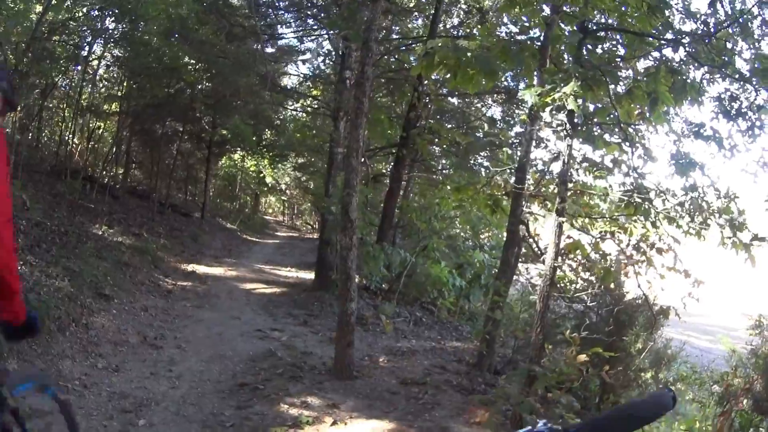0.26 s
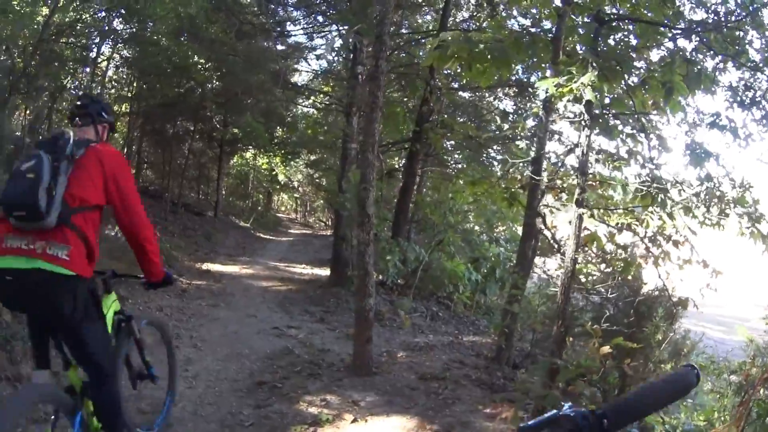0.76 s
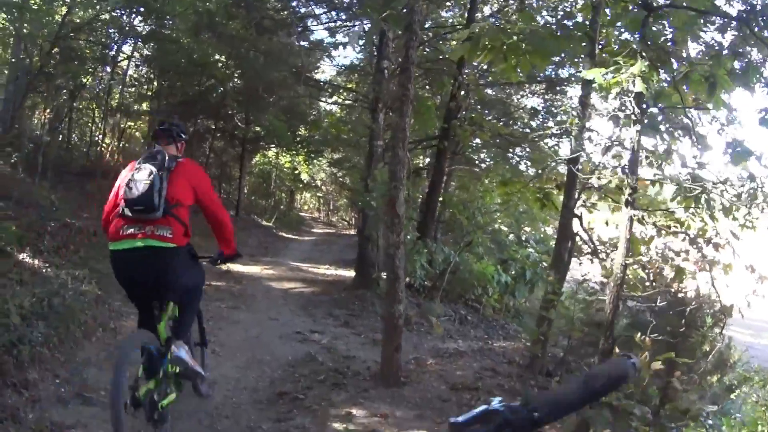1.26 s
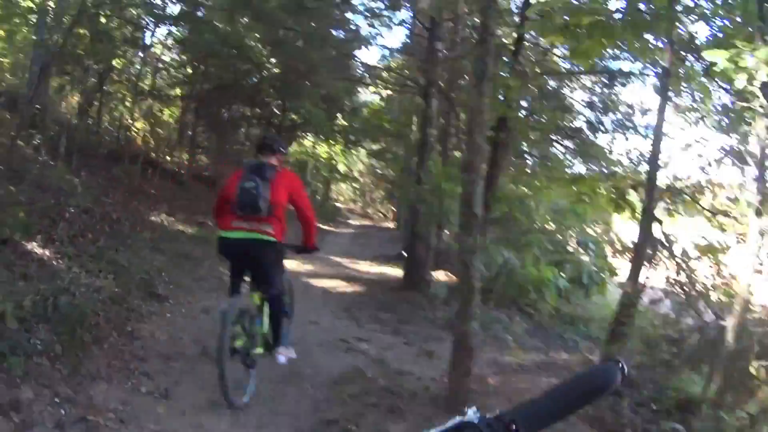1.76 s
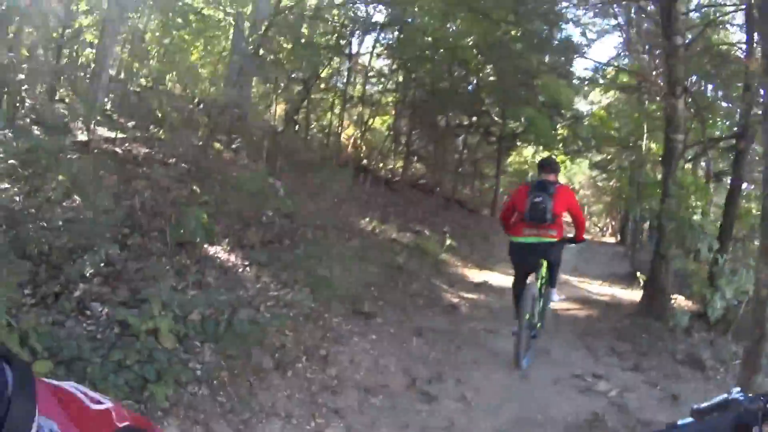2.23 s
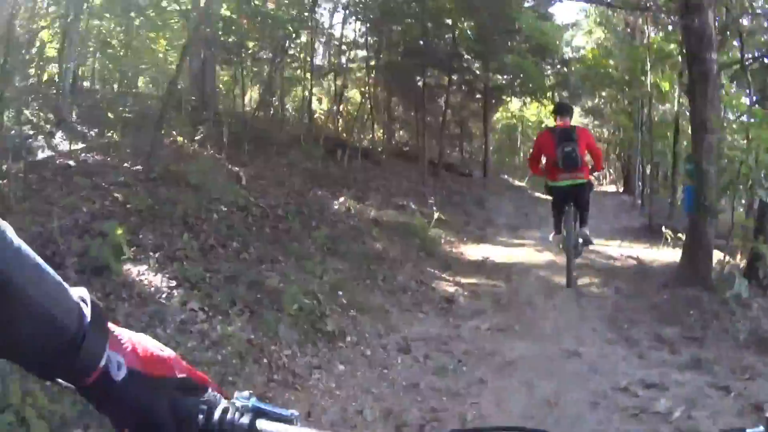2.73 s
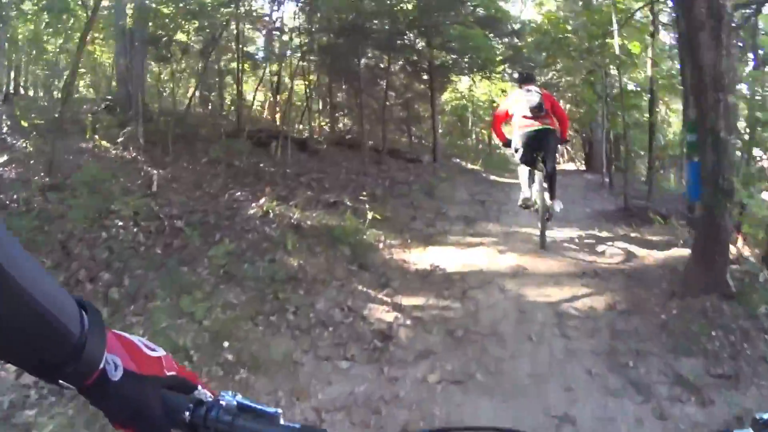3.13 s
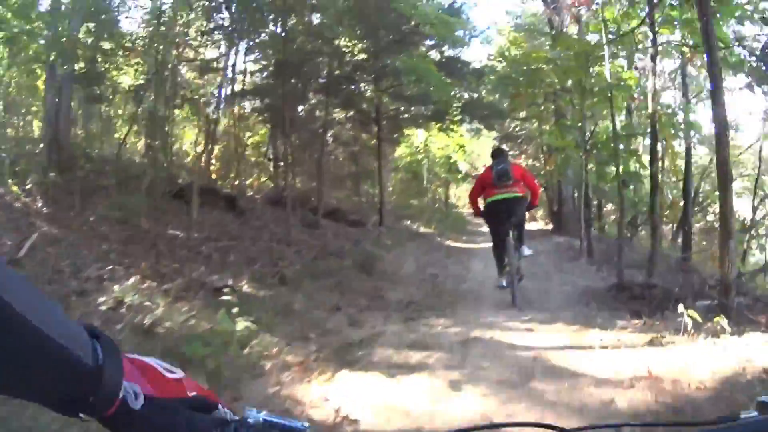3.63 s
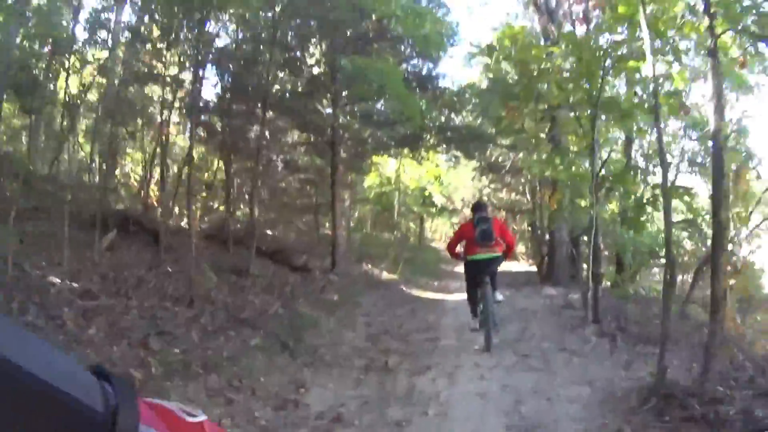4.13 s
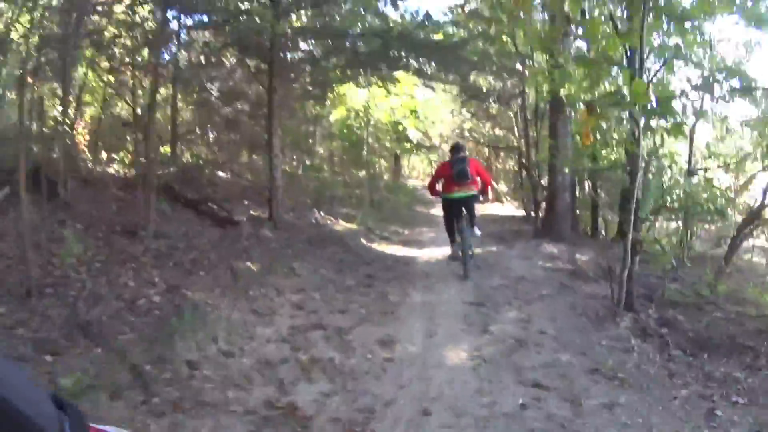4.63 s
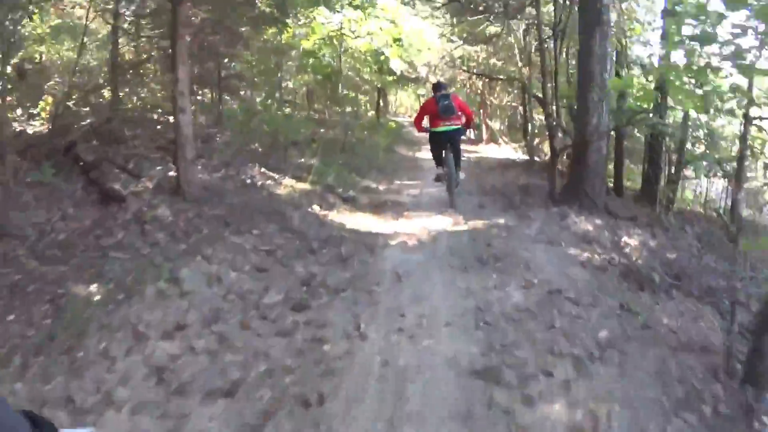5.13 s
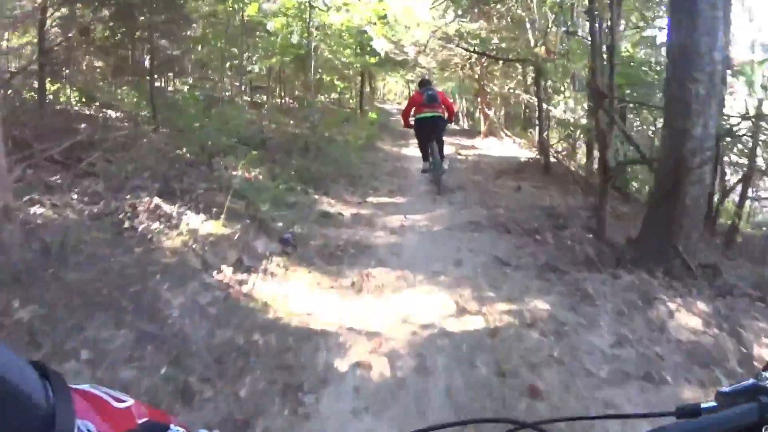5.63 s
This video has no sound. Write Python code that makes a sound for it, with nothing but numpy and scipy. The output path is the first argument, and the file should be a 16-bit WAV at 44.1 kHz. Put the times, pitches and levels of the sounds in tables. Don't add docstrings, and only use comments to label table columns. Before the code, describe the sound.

A bike passes on the left with slow ticks, then tyres crunch over a leafy trail, faster and grittier, until a freewheel whirrs.

```python
import sys
import numpy as np
from scipy import signal
from scipy.fft import rfft, irfft, next_fast_len
from scipy.io import wavfile

SR = 44100
rng = np.random.default_rng(int(sys.argv[2]) if len(sys.argv) > 2 else 0)


def master_out(mix):
    frames = np.transpose(np.atleast_2d(mix))
    ceiling = np.clip(frames, -1, 1)
    pcm = np.round(ceiling * 32767).astype(np.int16)
    wavfile.write(sys.argv[1], SR, pcm)


def rack_gain(trim_db):
    fader = np.asarray(trim_db, float)
    return 10 ** (fader / 20)


N = 259114

# freq_hz, density_db (per Hz)
FRAME_COLOUR = [(12, -25), (20, -4), (92, -2.5), (149, -1.5), (215, -1), (335, -1.5), (549, 2), (654, -1.5),
                (900, -4), (1170, -31), (1980, -120)]
# freq_hz, left_minus_right_db
STEREO_LEAN = [(60, -3.5), (120, 1), (220, 0), (420, 1), (820, 0), (1570, -2), (3010, -5), (5780, -2),
               (11100, -0.5)]


def rms_one(x):
    return x / np.sqrt(np.mean(x ** 2) + 1e-20)


def in_time(rows):
    s, *columns = np.transpose(rows)
    return [np.interp(np.arange(N) / SR, s, c) for c in columns]


def at_hz(points, hz):
    table_hz, value = np.transpose(points)
    return np.interp(np.log(hz + 1), np.log(table_hz), value)


def dying(t, t60):
    return rack_gain(-60 * t / t60)


def drift(rate):
    r = np.exp(-80 * np.pi * rate / SR)
    noise = rng.standard_normal(N // 40 + 2002)
    slow = signal.lfilter([1], [1, -2 * r, r * r], noise)[2000:]
    return np.interp(np.arange(N) / 40, np.arange(len(slow)), rms_one(slow))


def resonator(hz, width_hz):
    r = np.exp(-np.pi * width_hz / SR)
    return [(1 - r * r) / 2, 0, (r * r - 1) / 2], [1, -2 * r * np.cos(2 * np.pi * hz / SR), r * r]


def resonance(x, hz, width_hz):
    return signal.lfilter(*resonator(hz, width_hz), x)


def gliding(x, hz, width_hz):
    out, state = np.empty_like(x), np.zeros((len(x), 2))
    for i in range(0, N, 512):
        b, a = resonator(hz[i], width_hz)
        out[:, i:i + 512], state = signal.lfilter(b, a, x[:, i:i + 512], zi=state)
    return out


def split(low, high, hz, high_db):
    low = signal.sosfilt(signal.butter(4, hz, fs=SR, output="sos"), low)
    high = signal.sosfilt(signal.butter(4, hz, "high", fs=SR, output="sos"), high)
    return low + rack_gain(high_db) * high


def grains(spectrum, per_s, spread_db, clump_db, clump_rate):
    # freq_hz, left_right_likeness (0 to 1)
    likeness = [(60, 0.87), (100, 0.94), (170, 0.77), (290, 0.91), (480, 0.61), (820, 0.53), (1370, 0.98),
                (2320, 0.64), (3900, 0.85), (6580, 0.55), (11100, 0.52)]
    sizes = rack_gain(spread_db * np.minimum(rng.exponential(1, N), 5) + clump_db * drift(clump_rate))
    cracks = sizes * (rng.random(N) < per_s / SR) * rng.choice([-1, 1], (2, N))
    size = next_fast_len(N + 4096)
    hz = np.arange(size // 2 + 1) * SR / size
    cepstrum = irfft(at_hz(spectrum, hz) * np.log(10) / 20, size)
    cepstrum[1:size // 2] *= 2
    colour = np.exp(rfft(cepstrum[:size // 2], size))
    mid, side = rfft(cracks, size) * colour
    alike = at_hz(likeness, hz)
    lean = rack_gain(at_hz(STEREO_LEAN, hz) / 2)
    mid, side = np.sqrt(1 + alike) * mid, np.sqrt(1 - alike) * side
    return rms_one(irfft([lean * (mid + side), (mid - side) / lean], size)[:, :N])


def add(out, s, sound, peak_db, pan_db):
    at = round(s * SR)
    sound = sound[:N - at]
    gain = rack_gain(peak_db + pan_db * np.array([[.5], [-.5]]))
    out[:, at:at + len(sound)] += sound / np.abs(sound).max() * gain


def leaf_cover(pace_db):
    # deepest_s, level_db, rise_s (by 10 dB), fade_s (by 10 dB)
    leaf_patches = [(0.22, -39, 0.1, 0), (0.43, -47, 1, 0), (0.83, -37, 0.2, 0.33),
                    (1.15, -33.5, 0.02, 0.1), (1.29, -32, 0.02, 0.08), (1.42, -30, 0.15, 0.13),
                    (1.539, -28.5, 0.03, 0.08), (1.64, -28, -0.2, 0), (1.766, -25.5, -0.06, 0.1),
                    (2.01, -28, 0.06, 0.04), (2.065, -28.5, 0.02, 0.08), (2.155, -32, 0.07, 0.06),
                    (2.198, -22.5, 0.05, 0.02), (2.37, -36, -1.07, 0.4), (2.5, -34, -0.18, 0.23),
                    (2.58, -38, -0.23, 0.2), (2.65, -49, 0.2, 0.5), (2.85, -28, -0.11, 0.07),
                    (2.9, -39.5, -0.1, 0.03), (3.11, -32, -0.28, 0.15), (3.239, -26, 0.02, 0.1),
                    (3.42, -30, 0.02, 0.14), (3.46, -30, 0.03, 0.06), (3.596, -26, 0, 0.1),
                    (3.77, -35, 0, 0.25), (3.959, -32.5, 0.03, 0.13), (4.26, -36, 0.1, 0.35),
                    (4.41, -33, 0.16, 0.65), (4.555, -26.5, 0.01, 0.06), (4.7, -28, 0.06, 0.08),
                    (5.19, -34, 0.26, 1.1), (5.69, -29, -0.1, 0.16)]
    t = np.arange(0, N, 40) / SR
    patches = np.zeros(len(t))
    for s, db, rise_s, fade_s in leaf_patches:
        away = np.maximum((s - t) / max(rise_s, .01), (t - s) / max(fade_s, .01))
        patches += rack_gain(2 * db - 20 * away)
    litter = rack_gain(2 * (-48 + 0.91 * pace_db))
    return 10 * np.log10(litter + np.interp(np.arange(N) / SR, t, patches))


def leaf_crush(level_db):
    # freq_hz, density_db (per Hz)
    crush_colour = [(880, -27.5), (1500, -13.5), (1660, -18), (1800, -5.5), (2120, -10), (2310, -3.5),
                    (2530, -5), (2790, -7.5), (3290, -32), (4200, -15), (5460, -27), (9240, -120)]
    # time_s, pitch_hz
    leaf_pitch = [(0, 2450), (0.5, 2600), (0.75, 2420), (1.2, 2550), (1.4, 2280), (1.47, 2350),
                  (1.56, 2700), (1.7, 2400), (2.0, 2300), (2.15, 2500), (2.85, 2380), (3.25, 2420),
                  (3.6, 2380), (3.95, 2380), (4.56, 2600), (4.7, 2290), (5.25, 2490), (5.88, 2850)]
    crush = grains(crush_colour, 5500, 2.7, 2.0, 43)
    shell = resonance(crush, 2280, 190)
    leaves = gliding(crush, *in_time(leaf_pitch), 350)
    return rack_gain(level_db) * rms_one(crush + 0.5 * shell + 1.2 * leaves)


def tread_drone(level_db):
    # freq_hz, density_db (per Hz)
    tread_colour = [(380, -24), (650, -17.5), (792, -12), (938, -12), (1200, -0.5), (1320, 3.5), (1470, -9),
                    (1730, -1), (2000, -9), (2600, -34), (4400, -120)]
    # time_s, level_db
    soft_soil = [(0, 4.5), (0.8, 2), (1.1, 4), (1.28, 7.5), (1.45, 8), (1.6, -3), (2.0, -3), (2.25, 6),
                 (2.6, 1), (3.0, 6), (3.3, -1), (4.0, -4), (5.88, -31)]
    tread = grains(tread_colour, 600, 1.1, 1.5, 23)
    squash = resonance(tread, 892, 161)
    return rack_gain(level_db) * (tread + rack_gain(*in_time(soft_soil)) * squash)


def grit_hiss(level_db):
    # freq_hz, density_db (per Hz)
    grit_colour = [(1760, -25), (3000, -0.5), (4000, -5.5), (5810, -2.5), (7170, -15.5), (8180, -12.5),
                   (10500, -20.5), (11200, -21), (14600, -46), (22000, -120)]
    coarse = grains(grit_colour, 9000, 3.86, 2.3, 100)
    fine = grains(grit_colour, 18000, 4.1, 1.0, 30)
    return rack_gain(level_db) * split(coarse, fine, 6840, -0.83)


def frame_rumble(level_db):
    deep = rack_gain(np.minimum(-50 - level_db, 0)) * grains(FRAME_COLOUR, 1500, 1.5, 2.5, 25)
    upper = grains(FRAME_COLOUR, 1500, 1.86, 2.9, 16.4)
    return rack_gain(level_db) * split(deep, upper, 163, 0.15)


def tyre_hum():
    # time_s, level_db
    hum_level = [(0, -77), (3.2, -58), (3.6, -52), (4.2, -52), (4.8, -51.5), (5.4, -47.5), (5.88, -48)]
    shake = grains(FRAME_COLOUR, 1500, 4.4, 3.8, 6.1)
    hum = resonance(resonance(shake, 263, 82), 264, 110)
    return rack_gain(*in_time(hum_level)) * rms_one(hum)


def tyres():
    # time_s, tread_db (pace), grit_db (looseness of the dirt)
    rolling = [(0.0, -49.5, -44.5), (0.18, -45, -44.5), (0.3, -50.5, -40), (0.6, -51, -40.5),
               (0.9, -47.5, -40), (1.16, -46, -42), (1.42, -45.5, -40), (1.83, -44, -38.5),
               (2.04, -41.5, -38.5), (2.55, -43.5, -41), (3.05, -40.5, -38.5), (3.25, -38.5, -33.5),
               (3.44, -40.5, -38.5), (4.05, -40.5, -35), (4.4, -39, -33.5), (5.09, -37, -31),
               (5.5, -38, -31.5), (5.88, -33.5, -29.5)]
    tread_db, grit_db = in_time(rolling)
    pace_db = tread_db + 42
    crush_db = leaf_cover(pace_db)
    swing_db = crush_db + 36
    rumble_db = -51 + 0.75 * pace_db + 0.29 * swing_db
    surface = leaf_crush(crush_db) + tread_drone(tread_db + 0.52 * swing_db)
    surface += grit_hiss(grit_db + 0.16 * swing_db)
    return surface + frame_rumble(rumble_db) + tyre_hum()


def clicks():
    # start_s, peak_db, ring_hz
    pawl_ticks = [(0.181, -22, 4400), (0.2054, -28, 6030), (0.232, -33, 5600), (0.246, -17.5, 5950),
                  (0.286, -11.5, 8920), (.325, -19, 5800), (.376, -19.5, 6100), (.4176, -19.5, 4230),
                  (0.4512, -18, 5800), (0.4875, -19, 4140), (0.5383, -21.5, 6100), (0.581, -23.5, 4270),
                  (.616, -19.5, 5870), (0.6502, -18, 4200), (.7042, -19, 5600), (0.7476, -20, 5400),
                  (0.786, -21.5, 5850), (.839, -16, 5100), (.9364, -16.5, 6100), (0.9873, -18.5, 5130)]
    # start_s, peak_db, ring_hz, top_db (brightness)
    leaf_snaps = [(1.0485, -18.5, 4500, -19), (1.2795, -19, 5600, -19), (1.5455, -16, 4460, -23),
                  (1.569, -21, 4160, -16), (1.5863, -24.5, 4560, -18), (1.6853, -14, 5200, -14),
                  (1.8495, -14.5, 4370, -15.5), (2.0553, -21.5, 5700, -21), (2.1495, -25.5, 5570, -20),
                  (2.345, -16, 4440, -23), (2.4159, -24, 5040, -18), (3.123, -13.5, 4520, -20),
                  (3.3166, -11, 4620, -6), (3.68, -20.5, 5570, -17), (3.993, -26, 5660, -17),
                  (4.0323, -18.5, 5130, -16), (4.238, -22, 3750, -22), (4.353, -16, 6150, -14),
                  (4.5468, -17.5, 5800, -19), (4.6802, -13, 5730, -12), (5.053, -11, 5130, -20),
                  (5.2123, -16, 5810, -15), (5.3792, -15, 5660, -13), (5.7803, -15.5, 5700, -9)]
    # start_s, peak_db, ring_hz, top_db (brightness)
    leaf_cracks = [(0.4276, -19, 4500, -22), (0.604, -27, 4300, -22), (0.997, -23, 3500, -22),
                   (0.8555, -15, 3980, -24), (0.863, -17, 4600, -22), (1.114, -30.5, 5000, -22),
                   (1.133, -27, 4690, -24), (1.51, -23, 4340, -21), (1.619, -4.5, 5000, -14),
                   (2.0144, -28, 4670, -26), (2.138, -24, 5700, -20), (2.1969, -26, 4320, -24),
                   (2.6496, -15, 4100, -14), (2.696, -20, 4350, -3), (2.736, -6, 3730, -6.5),
                   (2.9118, -8, 5030, -1), (3.331, -20, 9700, -6), (3.875, -17, 3760, -20),
                   (4.1714, -36, 4400, -21), (4.1949, -32, 4790, -22), (4.296, -13, 3700, -24),
                   (4.346, -21, 5160, -17), (4.7516, -23, 3500, -18), (5.1735, -22, 3580, -24),
                   (5.4984, -15, 5700, -20.5), (5.6195, -17, 5610, -16)]
    pawls = [(s, db, hz, 0.034, -11.5) for s, db, hz in pawl_ticks]
    snaps = [(s, db, hz, 0.011 + 0.0081 * s, top) for s, db, hz, top in leaf_snaps]
    cracks = [(s, db, hz, 0.0087, top) for s, db, hz, top in leaf_cracks]
    return pawls + snaps + cracks


def ticks():
    # time_s, left_minus_right_db
    bearing = [
        (0, 9),
        (0.75, 7.5),
        (1.05, 6),
        (2.1, 2),
        (2.7, -5),
        (5.88, -2.5),
    ]
    out, t = np.zeros((2, N)), np.arange(4096) / SR
    body = signal.butter(2, [2200, 6800], "band", fs=SR, output="sos")
    top = signal.butter(3, 7000, "high", fs=SR, output="sos")
    pan_db, = in_time(bearing)
    for s, peak_db, hz, t60, top_db in clicks():
        fizz = rng.standard_normal(len(t)) * (dying(t, t60) + 0.44 * dying(t, 3.25 * t60))
        fizz[0] += 0.17 / t60 * rack_gain(0.31 * (peak_db + 17.5))
        tick = 3.65 * resonance(fizz, hz, 0.059 * hz) + 1.72 * signal.sosfilt(body, fizz)
        tick += rack_gain(0.63 * top_db + 9.5) * signal.sosfilt(top, fizz)
        add(out, s, tick, peak_db, pan_db[round(s * SR)])
    return out


def blows():
    # start_s, peak_db, ring_hz
    stones = [(.1819, -25, 1380), (1.8619, -18, 1390), (2.3425, -22, 1320), (2.6308, -22, 1400),
              (3.0757, -23, 1280), (3.1308, -10, 1090), (3.4217, -18.5, 1310), (3.747, -21.5, 1300),
              (4.4395, -16, 1330), (4.5495, -20, 1340), (4.5744, -23, 1410), (4.6418, -12, 1200),
              (4.675, -19, 1310), (4.7552, -18, 1340), (5.4051, -15, 1440), (5.8204, -16.5, 1720)]
    chain_slaps = [(.2843, -28.5, 2450), (1.3924, -21, 2240), (1.4527, -21.5, 2260), (1.6566, -11.5, 2360),
                   (1.7528, -19.5, 2380), (1.7744, -28, 2260), (2.0127, -10.5, 2250), (2.0567, -12.5, 2480),
                   (2.2058, -17, 2440), (2.4303, -16, 2230), (2.5028, -20, 2590), (2.8445, -19, 2300),
                   (2.9422, -11.5, 2276), (3.091, -16.5, 2260), (3.254, -11, 2370), (3.463, -17.5, 2440),
                   (3.54, -16, 2220), (4.3947, -10.5, 2420), (4.4018, -12, 2190), (4.5476, -7.5, 2580),
                   (4.6303, -13.5, 2300), (5.177, -13.5, 2210)]
    twigs = [(.416, -24, 2840), (.4283, -19.5, 2550), (.6477, -25.5, 3160), (.6939, -26, 1710),
             (.8551, -18.5, 3240), (.862, -21, 3000), (1.047, -22.5, 3000), (1.0678, -25, 2600),
             (1.5454, -12.5, 2810), (1.6196, -10.5, 2680), (2.4167, -17, 2670), (2.6498, -9.5, 2850),
             (2.6823, -18, 3280), (2.6895, -14, 3590), (2.9367, -22, 3690), (2.9554, -15, 3020),
             (3.1234, -15.5, 2900), (3.5703, -12, 2640), (3.8762, -18.5, 2890), (4.5744, -16, 2450),
             (4.878, -13.5, 5700), (4.9718, -14.5, 2740), (5.2101, -15, 3200), (5.357, -18.5, 2500),
             (5.452, -13.5, 3340), (5.7935, -12, 3310), (5.8546, -14.5, 3010)]
    clacks = [
        (2.0135, -16.5, 1500),
        (2.058, -20, 1410),
        (2.197, -6.5, 2195),
        (2.198, -12.5, 1280),
        (2.2062, -15, 1230),
        (4.1712, -7, 2280),
        (4.172, -13, 1280),
        (4.173, -13.5, 1865),
    ]
    crackles = [(0.378, -32, 3190), (0.507, -28.5, 2730), (0.7514, -28, 2570), (0.813, -25, 2330),
                (0.8379, -26, 2280), (1.1028, -27, 2250), (1.2058, -27, 2800), (1.282, -28, 2590),
                (1.295, -22, 2400), (1.3577, -28, 2400), (1.4262, -25.5, 2270), (1.4883, -27, 2650),
                (1.5102, -21, 2530), (1.927, -26, 2370), (1.9652, -23.5, 2520), (2.0042, -15.5, 2350),
                (2.152, -24, 2520), (2.3844, -29, 2530), (2.6372, -20, 1390), (2.9758, -25, 2900),
                (3.0028, -30, 1330), (3.0542, -25, 1310), (3.1806, -19, 2530), (3.2033, -17.5, 2250),
                (3.315, -26, 3140), (3.5012, -26, 2570), (3.7785, -30, 2320), (3.8148, -27, 2470),
                (3.8362, -22, 1310), (3.9303, -20.5, 2360), (4.0175, -29, 2460), (4.056, -27, 2300),
                (4.2103, -21, 2640), (4.2445, -19, 2320), (4.3125, -20, 3670), (4.357, -28, 2280),
                (4.6967, -14.5, 2240), (4.7887, -20, 2970), (5.1902, -15.5, 2410), (5.3148, -16.5, 2440),
                (5.484, -23, 2780), (5.664, -17.5, 2530)]
    pebbles = [(4.7846, -25, 1330), (4.842, -27, 1330), (4.8601, -29, 1250), (4.8781, -25, 1300),
               (4.9307, -22, 1400), (5.0218, -21.5, 1260), (5.057, -27, 1260), (5.0766, -24, 1320),
               (5.1767, -31, 1310), (5.2138, -33, 1230), (5.38, -22, 1400), (5.405, -19, 1320),
               (5.5177, -24, 1350), (5.5551, -32, 1300), (5.5955, -25, 1500), (5.6316, -22, 1210),
               (5.6527, -22.5, 1370), (5.7057, -20.5, 1330), (5.7636, -26, 1300), (5.8195, -31, 1560),
               (5.8424, -27, 1310), (5.8565, -28, 1320)]
    # rows, t60_s at -15.5 dB, crunch share
    kinds = [(stones, 0.031, 0.56), (chain_slaps, 0.021, 0.39), (twigs, 0.02, 0.32),
             (clacks, 0.035, 0.11), (crackles, 0.013, 0.37), (pebbles, 0.016, 0.3)]
    return sorted((s, db, hz, t60 * rack_gain(-0.45 * (db + 15.5)), crunch)
                  for rows, t60, crunch in kinds for s, db, hz in rows)


def knocks():
    # mode_hz, level_db, t60_s
    shell_modes = [(549, -14, 0.04), (783, -10.5, 0.03), (1117, -10, 0.03), (1383, 1.5, 0.022),
                   (1805, -3, 0.022), (2260, -6.5, 0.023), (2540, -6, 0.03)]
    out, t = np.zeros((2, N)), np.arange(2048) / SR
    band = signal.butter(3, [900, 3600], "band", fs=SR, output="sos")
    mode_hz, mode_db, mode_t60 = np.transpose(shell_modes)[:, :, None]
    shell = rack_gain(mode_db) * dying(t, mode_t60) * np.sin(2 * np.pi * mode_hz * t)
    for s, peak_db, hz, t60, crunch in blows():
        noise = rng.standard_normal(len(t))
        near = np.exp(-(np.log(mode_hz[:, 0] / hz) / 0.75) ** 2)
        answer = (0.46 + 0.5 * rng.standard_normal(len(near))) * near
        ring = np.sin(2 * np.pi * hz * t) * dying(t, t60) + 0.58 * answer @ shell
        ring += 0.4 * np.sin(4 * np.pi * hz * t) * dying(t, 0.0077)
        crack = 3.0 * signal.sosfilt(band, noise[::-1] * dying(t, 0.0097))
        trail = noise * dying(t, 2.94 * t60)
        trail = 2.6 * resonance(trail, hz, 0.2 * hz) + signal.sosfilt(band, trail)
        onset = 1 - np.exp(-t / 0.0002)
        add(out, s, (ring + crunch * (crack + trail)) * onset, peak_db, at_hz(STEREO_LEAN, hz))
    return out


def thumps():
    # start_s, peak_db, ring_hz, t60_s
    bumps = [(0.603, -42.5, 460, 0.035), (0.645, -41.5, 528, 0.025), (0.737, -32.5, 188, 0.018),
             (1.12, -42, 188, 0.038), (1.291, -41, 105, 0.04), (1.385, -43, 133, 0.07),
             (1.874, -30.5, 157, 0.03), (2.181, -24.5, 193, 0.012), (2.341, -32.5, 546, 0.042),
             (2.435, -40, 96, 0.021), (2.945, -25, 772, 0.032), (3.133, -31.5, 116, 0.08),
             (3.135, -29, 113, 0.04), (3.506, -36, 184, 0.028), (3.788, -32.5, 206, 0.026),
             (4.172, -39, 511, 0.08), (4.258, -37, 360, 0.036), (4.476, -30, 189, 0.045),
             (4.623, -23, 173, 0.032), (4.642, -21.5, 179, 0.017), (4.777, -41, 258, 0.03),
             (5.178, -37, 266, 0.059), (5.384, -31, 590, 0.033)]
    out, t = np.zeros((2, N)), np.arange(4096) / SR
    band = signal.butter(2, [70, 800], "band", fs=SR, output="sos")
    knock = signal.sosfilt(band, np.exp(-((t - .003) / 0.00018) ** 2))
    for s, peak_db, hz, t60 in bumps:
        push = np.sin(2 * np.pi * hz * t) * dying(t, t60) * (1 - np.exp(-t / 0.0047))
        add(out, s, push + 0.68 * knock, peak_db, 0)
    return out


def groan():
    # time_s, pitch_hz, level_db
    slip = [
        (4.4, 185, -55),
        (4.412, 179, -46),
        (4.435, 139.5, -40),
        (4.455, 136, -40.5),
        (4.47, 125, -64),
    ]
    hz, level_db = in_time(slip)
    phase = 2 * np.pi * np.cumsum(hz) / SR
    t = np.arange(N) / SR
    sounding = (t > slip[0][0]) * (t < slip[-1][0])
    return rack_gain(level_db) * (np.sin(phase) + 1.23 * np.cos(2 * phase)) * sounding


def whirr():
    # time_s, level_db
    coast = [
        (4.5, -61),
        (4.7, -42),
        (4.9, -35),
        (5.4, -34),
        (5.88, -33),
    ]
    # freq_hz, density_db (per Hz)
    pawl_colour = [(2060, -23), (3500, -2.5), (4030, -11), (4340, 1), (4620, -5), (5810, -1), (7230, -10),
                   (8200, -2), (10300, -10.5), (11200, -7), (14600, -47), (22000, -120)]
    level_db, = in_time(coast)
    pawls_per_s = 83.5
    turns = np.cumsum(pawls_per_s * (1 + 0.02 * drift(5.7))) / SR
    since_drop_s = (turns % 1) / pawls_per_s
    gate = (np.exp(-since_drop_s / 0.0043) + 0.25) * rack_gain(0.91 * drift(24))
    coasting = np.arange(N) > coast[0][0] * SR
    return coasting * rack_gain(level_db) * rms_one(gate * grains(pawl_colour, 25000, 1.5, 0.71, 36))


def scene():
    return tyres() + ticks() + knocks() + thumps() + groan() + whirr()


def roll_off(x):
    return signal.sosfilt(signal.butter(12, 11690, fs=SR, output="sos"), x)


def record(dry):
    steep = signal.cheby2(14, 44, 11404, fs=SR, output="sos")
    return roll_off(signal.sosfilt(steep, dry))


dry = scene()
out = record(dry)
master_out(out)
```